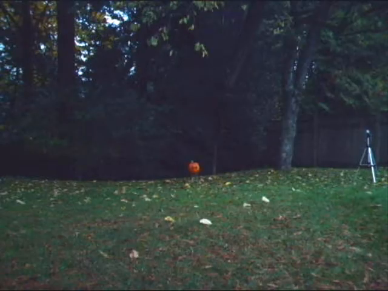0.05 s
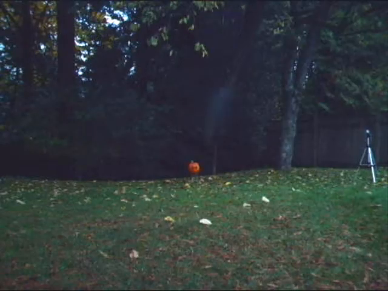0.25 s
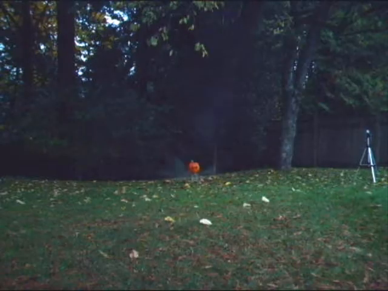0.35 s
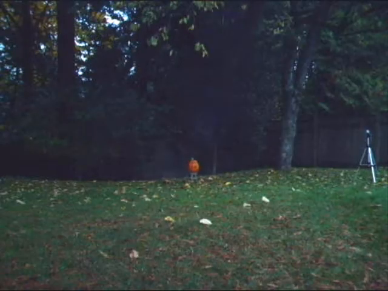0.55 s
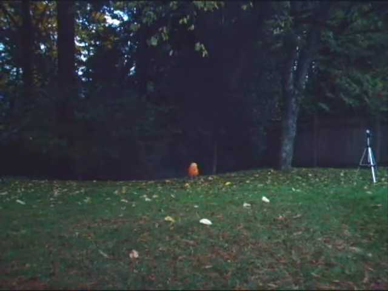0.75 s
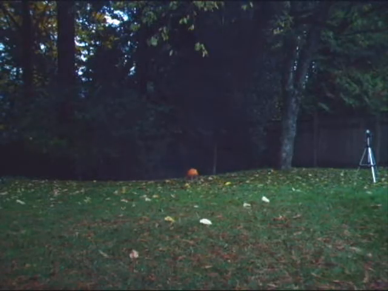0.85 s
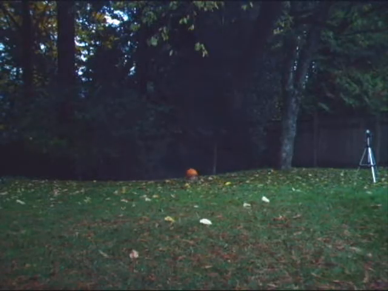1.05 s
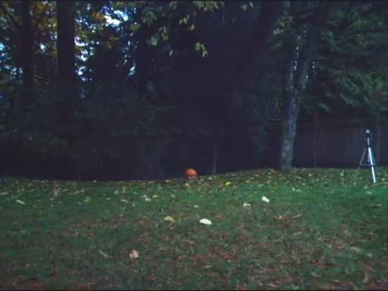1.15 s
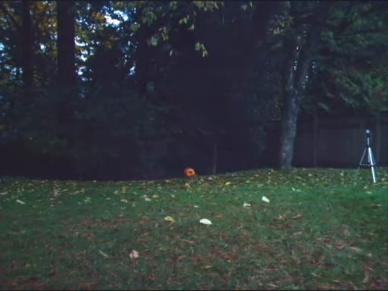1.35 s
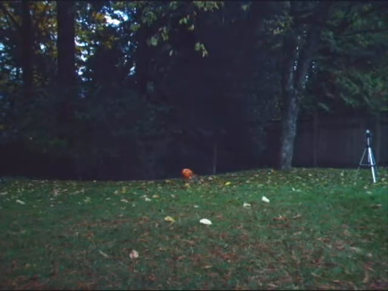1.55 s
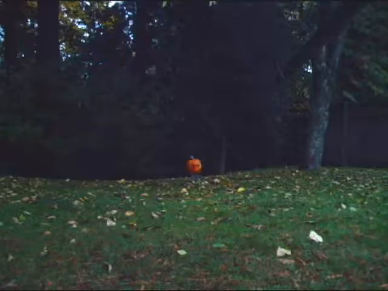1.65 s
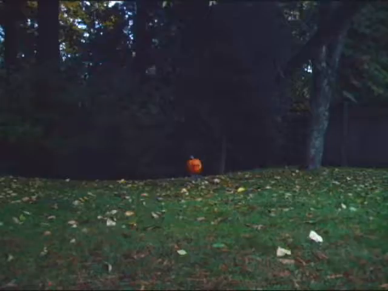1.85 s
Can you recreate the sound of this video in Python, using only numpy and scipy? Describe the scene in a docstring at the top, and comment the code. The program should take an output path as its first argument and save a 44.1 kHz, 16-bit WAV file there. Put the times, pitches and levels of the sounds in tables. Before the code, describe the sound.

A loud gas blast from a homemade launcher, with a hollow rattle and a knock.

```python
"""Gas launcher in a back yard

A home-made launcher fires. Ignition excites the barrel's modes near 680 Hz; the jet roars, and its gusts
overload the microphone, which chokes in short gaps. A hollow rattle and one knock follow while the
report dies away among the trees, over the low throb of something like an idling engine."""
import sys
import numpy as np
from scipy import signal
from scipy.fft import rfft, irfft
from scipy.io import wavfile

SR = 44100
rng = np.random.default_rng(int(sys.argv[2]) if len(sys.argv) > 2 else 0)


def dump_mix(stems):
    """Bounce the given channels to the path in sys.argv[1] as a 16-bit WAV at rate SR."""
    frames = np.atleast_2d(stems).T  # one column per channel
    limited = np.clip(frames, -1, 1)  # hard clip at full scale
    pcm = np.round(limited * 32767).astype(np.int16)
    wavfile.write(sys.argv[1], SR, pcm)


N = 83790
FIRE_S = .1968

# yard background spectrum: frequency_hz, density_db
YARD_SPECTRUM = [(20, -14), (45, 3.5), (75, 1), (130, -4), (210, -10.5), (420, -18), (720, -18),
                 (1000, -27.5), (1600, -35.5), (3000, -37), (4100, -47), (5000, -40.5), (6300, -45.5),
                 (8200, -41), (10000, -48.5), (14000, -49), (16000, -49)]
# exhaust resonances: pitch_hz, width_hz, gain_db
EXHAUST_MODES = [(67, 96, -4), (121, 36, -5), (178, 55, -6.5)]
# hollow resonances of the rattle and knock: frequency_hz, density_db
HOLLOW_SPECTRUM = [(600, -5.5), (1800, -13), (2250, -8.5), (2600, 4), (3000, -7.5), (3500, -12.5),
                   (4100, -31), (4800, -11), (5420, -5), (5900, -22), (6700, -28), (8000, -42), (9900, -28),
                   (10580, -10), (11400, -18.5), (12100, -49), (13400, -9), (14300, -33), (16000, -13)]
# deep rumble behind the jet: frequency_hz, density_db
RUMBLE_SPECTRUM = [(20, -2), (45, -8), (72, 4), (110, -7), (160, -22.5), (400, -49)]
# rumble envelope: time_s, level_db
RUMBLE_ENVELOPE = [(.235, -43), (.265, -8.5), (.34, -15), (.47, -6), (.53, -8.5), (.645, -4.5), (.7, -14.5),
                   (.82, -24.5), (.95, -31.5), (1.1, -26.5), (1.4, -46)]
# buffeting air: frequency_hz, density_db
GUST_SPECTRUM = [(15, -16), (35, -8), (75, -4.5), (135, 8.5), (230, 0.5), (450, -21), (1500, -62)]
# gust envelope: time_s, level_db
GUST_ENVELOPE = [(.2, -34), (.245, -38), (.265, -19), (.31, -7), (.39, -6), (.44, -5), (.49, -16.5),
                 (.54, -9.5), (.6, -21.5), (.7, -26), (1.0, -34.5)]
# pressure surges on the diaphragm: start_s, length_s, polarity
PRESSURE_SURGES = [(.321, 0.0041, -1), (.3258, 0.005, -1), (.3335, .008, 1), (.352, .025, 1),
                   (.3805, 0.0051, 1), (0.3938, 0.002, -1), (0.399, 0.0015, -1), (.4058, 0.00305, -1),
                   (0.4134, 0.002, -1), (.421, .005, -1), (.433, 0.0049, -1), (0.4569, .004, -1),
                   (0.479, 0.002, -1)]
# gas jet spectrum: frequency_hz, density_db
JET_SPECTRUM = [(40, 3.5), (200, -15.5), (350, -11.5), (600, 3), (900, -4.5), (1500, -6.5), (2800, -7.5),
                (5000, -13.5), (8000, -32), (11000, -19), (16000, -27.5)]
# jet envelope: time_s, level_db
JET_ENVELOPE = [(.196, -20.5), (.204, 0), (.221, -17), (.226, -43), (.255, -28), (.266, -7.5), (.29, -1.5),
                (.35, -3.5), (.41, -3.5), (.46, -4), (.51, -7.5), (.56, -13), (.62, -31), (.68, -46),
                (.76, -80)]
# sharp crackles of the overloaded microphone: start_s, level_db
OVERLOAD_CRACKS = [(.2, -5), (0.205, -4), (.2135, -7), (0.2189, -3), (0.2325, -0.5), (0.2614, 2),
                   (0.5493, -7), (.5995, -3), (0.6053, -2), (0.637, -9)]
# hollow boom of the report: frequency_hz, density_db
REPORT_SPECTRUM = [(60, -29), (190, -17), (330, -17), (520, -7.5), (690, 0), (830, -7.5), (1000, -15.5),
                   (1250, -16), (1700, -37), (3000, -28), (4100, -42), (5500, -33), (16000, -55)]
# report envelope: time_s, level_db
REPORT_ENVELOPE = [(.197, -20), (.205, -3), (.25, -12.5), (.275, -3.5), (.315, -3.5), (.36, -10),
                   (.5, -11.5), (.58, -11), (.69, -14), (.75, -19.5), (.86, -27), (1.02, -36), (1.15, -45),
                   (1.4, -65)]
# echo from the trees: frequency_hz, density_db
ECHO_SPECTRUM = [(60, -13), (190, -1), (370, -13), (520, -6.5), (720, 2), (900, -4.5), (1200, -14.5),
                 (1700, -25.5), (3000, -28), (4100, -42), (16000, -45)]
# barrel modes: pitch_hz, level_db, t60_s
BARREL_MODES = [(686, -2, 0.26), (755.6, -11, 0.66), (563, -20, 0.26), (474, -10, 0.37), (183, -12, 0.23)]
# high microphone resonances excited by the blast: pitch_hz, width_hz, gain_db
MICROPHONE_RING_MODES = [(7310, 560, 0), (8720, 560, -1), (15330, 800, -6)]
# microphone resonances that colour every sound: pitch_hz, width_hz, gain_db
MICROPHONE_MODES = [(7222, 184, 1.5), (8600, 150, -2), (16600, 780, -2)]


def undb(db):
    """Amplitude ratio of a level in decibels."""
    return 10 ** (np.asarray(db) / 20)


def unit(x):
    """Normalisation to rms 1."""
    return x / np.sqrt(np.mean(x ** 2))


def since(start_s):
    """Elapsed seconds at every sample."""
    return np.arange(N) / SR - start_s


def fade(age, t60_s):
    """Exponential damping: full level until age 0, then 60 dB down every t60_s."""
    return np.exp(-np.log(1000) * np.maximum(age, 0) / t60_s)


def envelope(points):
    """Gain interpolated in decibels between points, silent outside them."""
    time_s, level_db = np.array(points).T
    return undb(np.interp(since(0), time_s, level_db, left=-np.inf, right=-np.inf))


def flutter(rate_hz, depth_db):
    """Random amplitude modulation, with rate_hz new levels a second."""
    return undb(depth_db * np.interp(since(0) * rate_hz, np.arange(N), rng.standard_normal(N)))


def noise(spectrum):
    """Spectral shaping of white noise, scaled to rms 1."""
    hz, db = np.array(spectrum).T
    bins_hz = np.maximum(np.fft.rfftfreq(N, 1 / SR), 1)
    gain = undb(np.interp(np.log(bins_hz), np.log(hz), db))
    return unit(irfft(rfft(rng.standard_normal(N)) * gain, N))


def resonate(x, modes):
    """Forced response of parallel resonators, each applied twice for steep sides."""
    response = np.zeros_like(x)
    for pitch_hz, width_hz, gain_db in modes:
        b, a = signal.iirpeak(pitch_hz, pitch_hz / width_hz, fs=SR)
        response += undb(gain_db) * signal.lfilter(b, a, signal.lfilter(b, a, x))
    return response


def yard(level_db=-30.5):
    """Stationary ambient noise, strongest in the bass."""
    return undb(level_db) * noise(YARD_SPECTRUM)


def engine(cycle_hz=14.68, strong_at_s=.0635, jitter_s=.0016, puff_s=.0019, level_db=-28):
    """A train of soft puffs, one weak and one strong per cycle, drives the exhaust resonances."""
    offbeat_db, scatter_db = -6, .5
    count = int(2 * cycle_hz * N / SR) + 2
    puffs = np.zeros(N)
    for k, (late, weakness) in enumerate(rng.standard_normal((count, 2))):
        age = since(strong_at_s + (k - 1) / (2 * cycle_hz) + jitter_s * late)
        strength = undb(offbeat_db * (k % 2 == 0) - scatter_db * weakness)
        puffs += strength * np.exp(-.5 * (age / puff_s) ** 2)
    return undb(level_db) * unit(resonate(puffs, EXHAUST_MODES))


def rattle(peak_s=.56, rise_s=.069, burst_db=-12.5, tail_db=-25.5):
    """A dense rattle excites a hollow resonator, swelling and then decaying at two rates."""
    age = since(peak_s)
    swell = np.exp(np.minimum(age, 0) / rise_s)
    burst = undb(burst_db) * flutter(rate_hz=180, depth_db=.5) * fade(age, t60_s=.54)
    tail = undb(tail_db) * fade(age, t60_s=1.38)
    return noise(HOLLOW_SPECTRUM) * swell * (burst + tail)


def knock(start_s=.663, ring_db=-1, click_db=-7):
    """One impact gives a broadband click and a heavily damped hollow ring."""
    age = since(start_s)
    ring = undb(ring_db) * noise(HOLLOW_SPECTRUM) * fade(age, t60_s=.038)
    click = undb(click_db) * noise(JET_SPECTRUM) * fade(age, t60_s=.014)
    return (ring + click) * (age >= 0)


def rumble():
    """Low-frequency noise rolls in behind the jet and outlasts it."""
    return noise(RUMBLE_SPECTRUM) * envelope(RUMBLE_ENVELOPE)


def gusts():
    """Pressure fluctuations in moving air buffet the microphone."""
    return noise(GUST_SPECTRUM) * envelope(GUST_ENVELOPE)


def surges(level_db=12.5, edge_s=.00042):
    """Flat-topped pressure pulses far exceed the diaphragm's linear range."""
    pressure = np.zeros(N)
    for start_s, length_s, polarity in PRESSURE_SURGES:
        age = since(start_s)
        inside_s = np.minimum(age, length_s - age)
        pressure += polarity * np.clip(inside_s / edge_s + .5, 0, 1) ** 2
    return undb(level_db) * pressure


def microphone_ring(level_db):
    """High microphone resonances ring under broadband excitation."""
    return undb(level_db) * unit(resonate(rng.standard_normal(N), MICROPHONE_RING_MODES))


def overload_crackles(t60_s=.0067):
    """Envelope of the overloaded microphone's sharp transients."""
    return sum(undb(db) * (since(s) >= 0) * fade(since(s), t60_s) for s, db in OVERLOAD_CRACKS)


def jet():
    """Turbulent burning gas radiates a sputtering roar; the overloaded microphone adds crackles."""
    roar = noise(JET_SPECTRUM)
    sputter = flutter(rate_hz=420, depth_db=4)
    return roar * (envelope(JET_ENVELOPE) * sputter + overload_crackles())


def report(echo_db=-27.5, echo_holds_until_s=.64):
    """A hollow boom rings the microphone; scattering from the trees leaves an uneven tail."""
    mic_ring = microphone_ring(level_db=-21)
    boom = (noise(REPORT_SPECTRUM) + mic_ring) * envelope(REPORT_ENVELOPE)
    echo = noise(ECHO_SPECTRUM) * flutter(rate_hz=22, depth_db=1.1) + mic_ring
    echo_gain = undb(echo_db) * fade(since(echo_holds_until_s), t60_s=3.2) * (since(FIRE_S) > 0)
    return boom + echo * echo_gain


def barrel(attack_s=.004):
    """Ignition sets the barrel and its air into damped free vibration; the microphone rings too."""
    age = np.maximum(since(FIRE_S), 0)
    ring = sum(undb(db) * np.sin(2 * np.pi * hz * age) * fade(age, t60) for hz, db, t60 in BARREL_MODES)
    mic_ring = microphone_ring(level_db=-22) * fade(age, t60_s=.62)
    return (ring + mic_ring) * np.minimum(age / attack_s, 1)


def scene():
    """Superposition of all sources at the microphone, in one channel."""
    blast = barrel() + report() + jet() + gusts() + rumble() + surges()
    return (blast + rattle() + knock() + engine() + yard())[None]


def record(dry, rail=.837, knee=7.5, leak_db=-31.5, bass_cut_hz=70, ceiling=.78, top_hz=15650):
    """Saturation pins the diaphragm; a high-pass drains its near-constant output, leaving short gaps."""
    drive = np.abs(dry / rail)
    saturated = dry / (1 + drive ** knee) ** (1 / knee)
    # the capsule snaps back near twice its rail, losing part of its output
    snap_loss = .41 * np.exp(-((drive - 2.05) / .2) ** 2)
    capsule = saturated * (1 - snap_loss) + undb(leak_db) * dry
    ringing = capsule + resonate(capsule, MICROPHONE_MODES)
    bass_cut = signal.butter(1, bass_cut_hz, "high", fs=SR, output="sos")
    treble_cut = signal.ellip(10, .1, 70, top_hz, fs=SR, output="sos")
    clipped = np.clip(signal.sosfilt(bass_cut, ringing), -ceiling, ceiling)
    return signal.sosfilt(treble_cut, clipped)


dry = scene()
out = record(dry)
dump_mix(out)
```